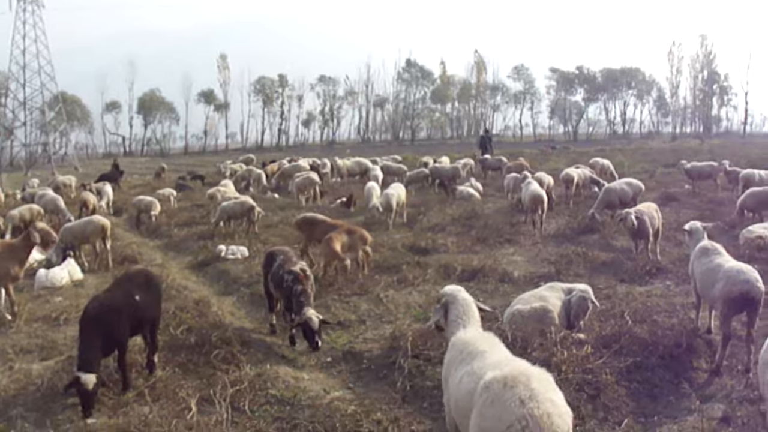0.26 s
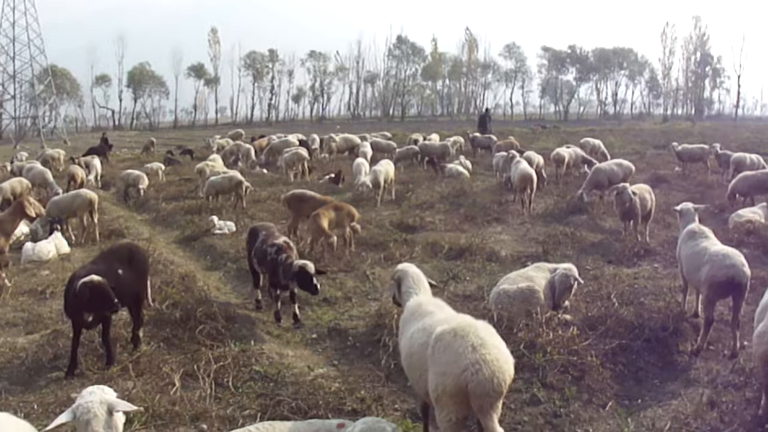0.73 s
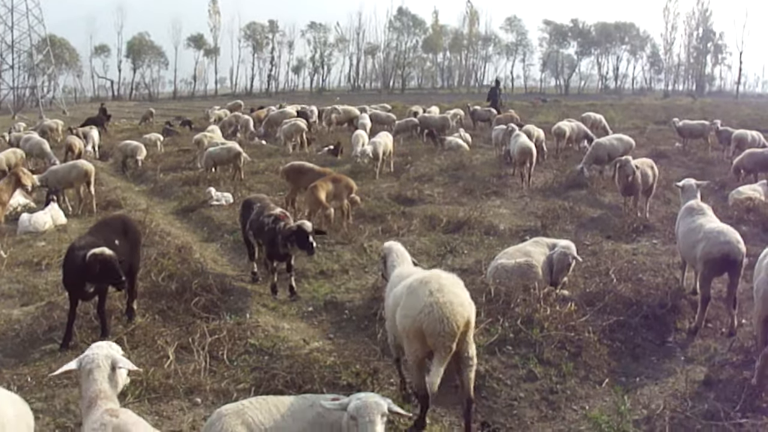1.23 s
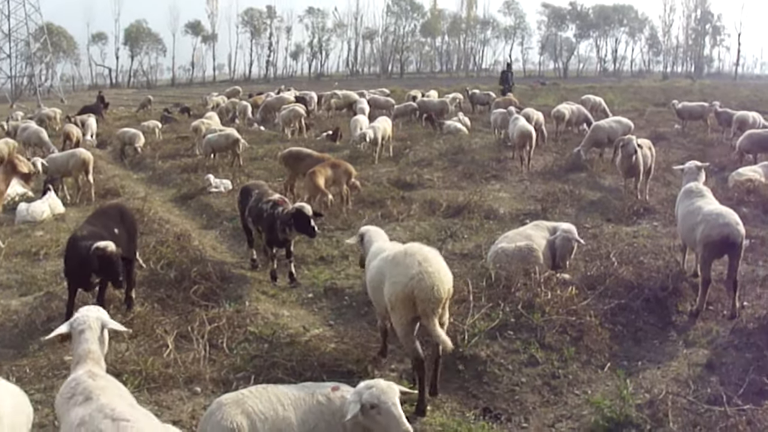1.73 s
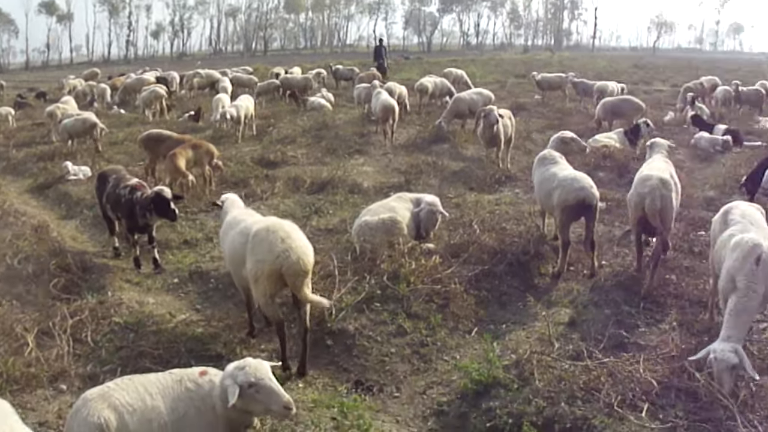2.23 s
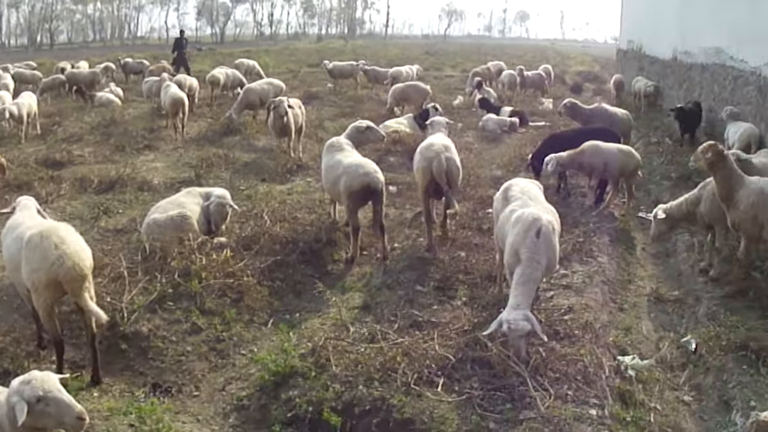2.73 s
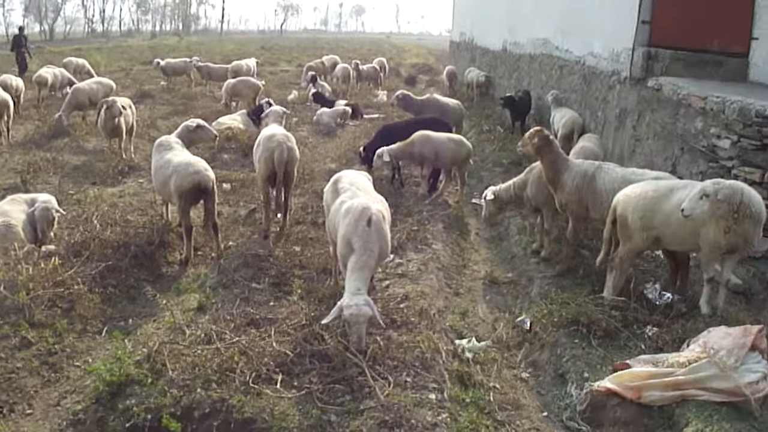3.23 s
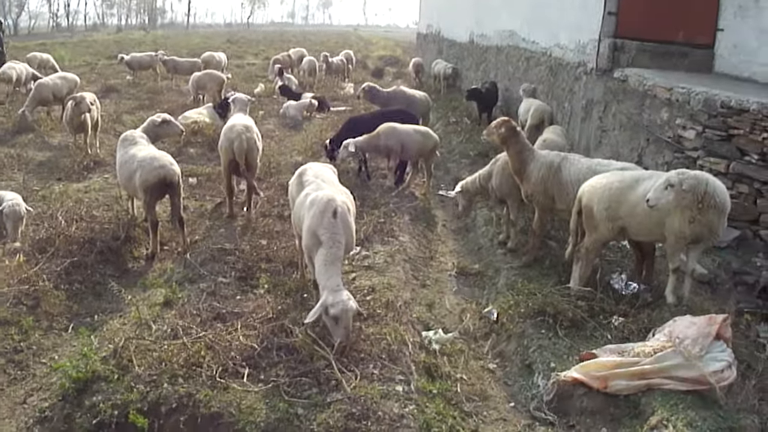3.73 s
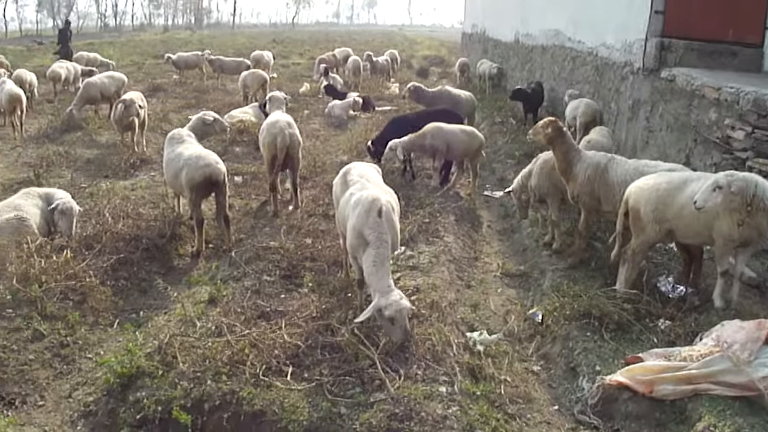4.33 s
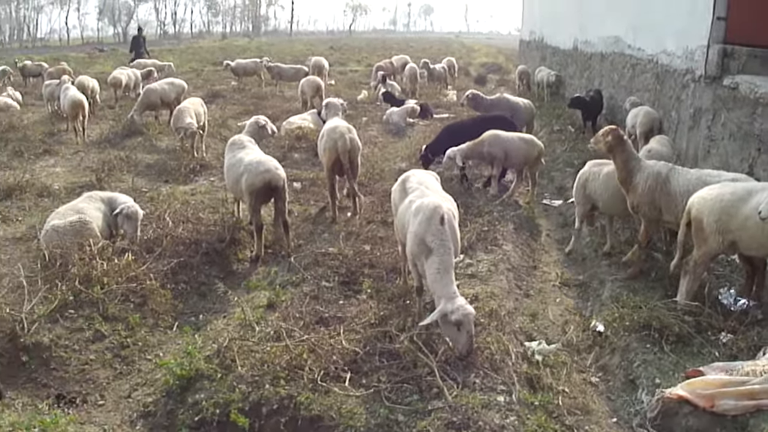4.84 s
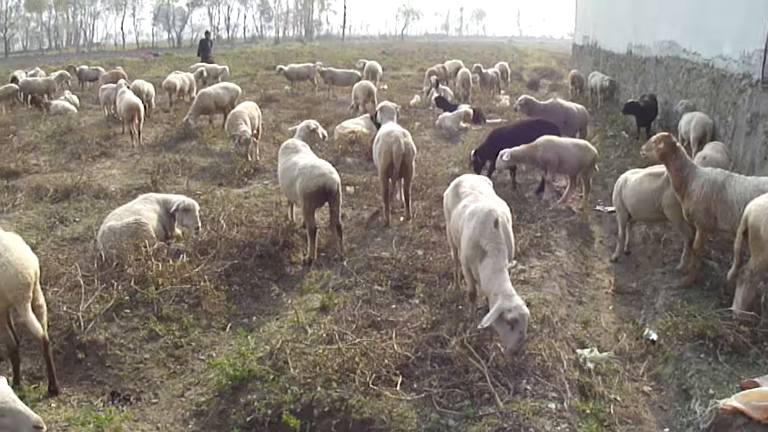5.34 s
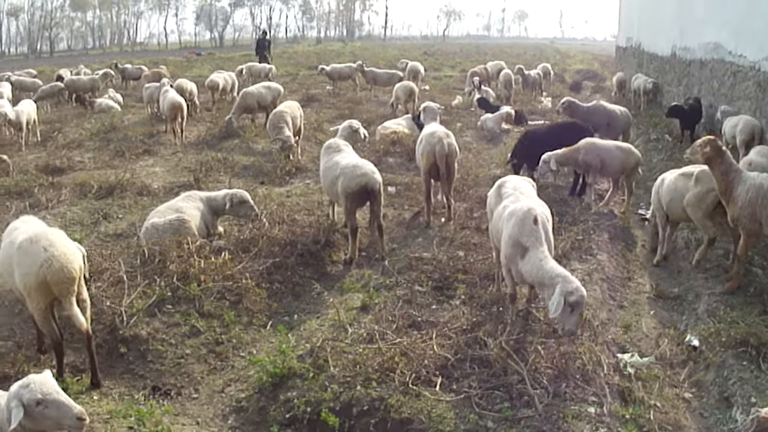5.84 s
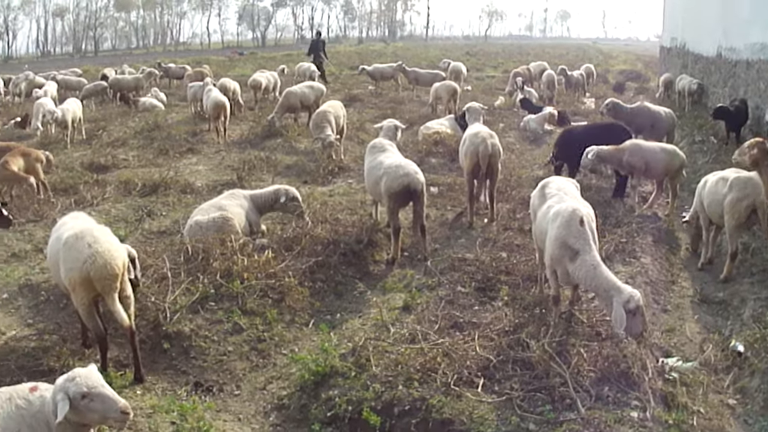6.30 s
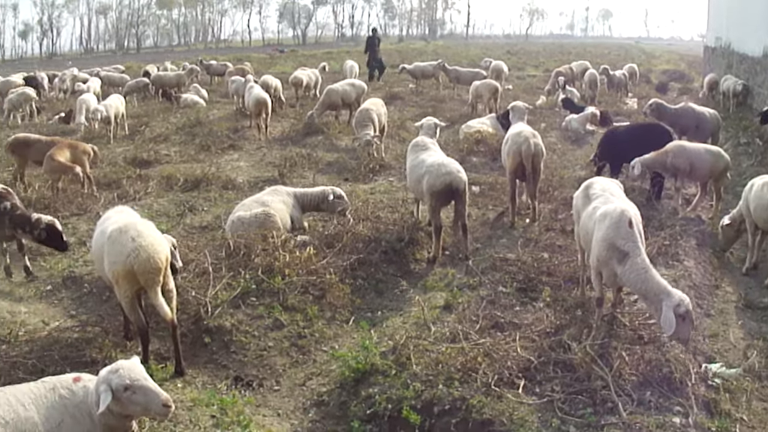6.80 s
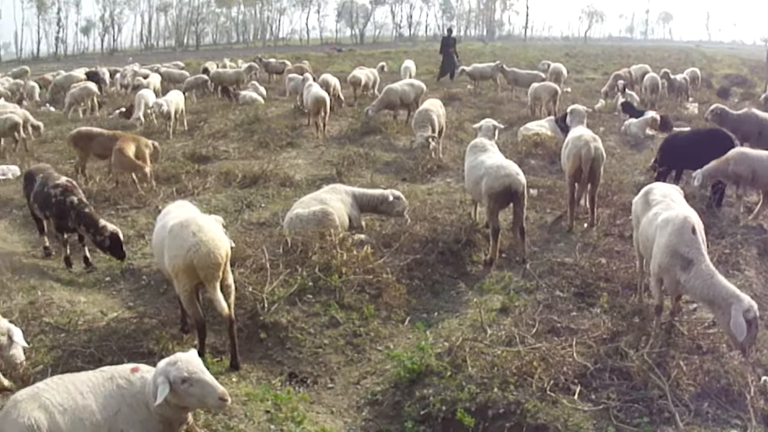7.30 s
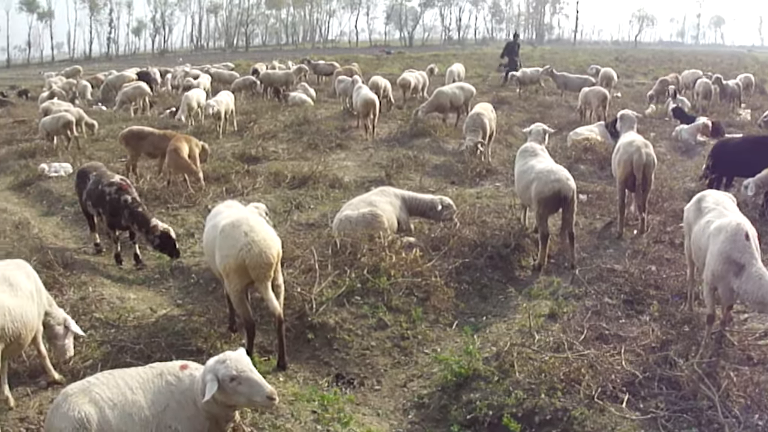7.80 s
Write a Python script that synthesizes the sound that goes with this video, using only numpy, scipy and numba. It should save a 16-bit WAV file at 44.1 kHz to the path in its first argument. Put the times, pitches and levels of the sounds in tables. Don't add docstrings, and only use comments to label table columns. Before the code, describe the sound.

Outdoors in a dry field with a grazing flock, stalks crackle and twigs snap under hooves while wind bumps the small microphone. A near sheep gives a loud, nasal bleat ending in a rattle, and a distant one answers with a low, faint grumble. After a quieter gap comes a softer, steady bleat, then a last loud one roughening at its end. A far one-cylinder engine throbs softly throughout.

```python
import sys
import numpy as np
from scipy import signal
from scipy.io import wavfile
from scipy.ndimage import uniform_filter1d
from numba import njit

SR = 44100
rng = np.random.default_rng(int(sys.argv[2]) if len(sys.argv) > 2 else 0)


def store_wav(level_fs):
    pcm = np.round(np.clip(np.atleast_2d(level_fs), -1, 1) * 32767)
    wavfile.write(sys.argv[1], SR, pcm.T.astype(np.int16))


def attenuation_scalar(level_db):
    decades = np.asarray(level_db, float) / 20
    return 10 ** decades


N = 355446

# (time [s], level [dB], mouth opening [0-1], effort [dB])
NEAR_CALL = [
    (1.362, -41.5, 0, -1),
    (1.452, -39, 0, 4),
    (1.463, -22, 0.02, 7.5),
    (1.6, -18, 0.83, -0.5),
    (1.796, -19, 0.79, 3.5),
    (1.974, -19.5, 0.82, -2),
    (2.19, -21.5, 0.56, -1.5),
    (2.365, -25, 0.45, 2),
    (2.42, -74, 0.02, -15),
]
FAR_CALL = [
    (2.469, -69, 0.36, 0),
    (2.51, -45.5, 0.87, -1),
    (2.6, -47, 0.97, 5.5),
    (2.766, -45, 0.3, 4),
    (2.86, -37, 0.51, -7),
    (2.93, -40.5, 0.45, -4),
    (3.01, -42.5, 0.27, -8),
    (3.2, -45.5, 0.29, -11),
    (3.28, -59, .5, -1),
]
MIDDLE_CALL = [
    (4.53, -46, 0.12, -8),
    (4.551, -35.5, 0.096, -2),
    (4.585, -29, 0.15, -2),
    (4.69, -28.5, 0.34, 2.5),
    (4.85, -29.5, 0.57, 4),
    (5.029, -29.5, 0.79, 9.5),
    (5.26, -29, 0.81, 3.5),
    (5.575, -31, 0.5, -2),
    (5.63, -66, 0.32, -11),
]
LAST_CALL = [
    (6.597, -54, 0.16, 9),
    (6.666, -42, 0.27, -4),
    (6.737, -29, 0.047, -2.5),
    (6.84, -18.5, 0.56, 2.5),
    (6.92, -20, 1, 4.5),
    (7.22, -23, 0.98, 0),
    (7.32, -24, 0.75, -0.5),
    (7.517, -26.5, 0.74, -3.5),
    (7.6, -75, 0.0018, -28),
]
# (time [s], pitch [Hz])
FOLD_PITCH = [
    [(1.44, 131.1), (1.482, 145.3), (1.56, 172.2), (1.602, 177.8), (1.658, 182.5), (1.794, 187.2),
     (1.974, 192.2), (2.12, 193.8), (2.3, 187.5)],
    [(2.47, 129.8), (2.572, 131.7), (2.766, 133.3), (2.85, 119.9), (3.0, 125.8), (3.28, 118)],
    [(4.5, 154.5), (4.556, 154.2), (4.592, 166.2), (4.64, 174.4), (4.694, 178.4), (4.886, 175),
     (5.31, 171.9), (5.534, 165.2), (5.6, 147)],
    [(6.6, 132.6), (6.765, 146.6), (6.81, 165.9), (6.84, 172.1), (6.9, 181), (7.058, 185.9), (7.3, 190.2),
     (7.43, 188), (7.5, 174)],
]
# (catch [s], clear voice [s], second folds start [s], folds go slack [s],
# unsteadiness when slack [0-1])
FOLD_TIMES = [(1.45, 1.565, 1.97, 2.17, .17), (2.48, 2.52, 9, 2.79, .8), (4.545, 4.6, 9, 5.6, .2),
              (6.735, 6.83, 7.28, 7.3, .15)]
# (lower shut [Hz], lower open [Hz], middle shut [Hz], middle open [Hz],
# upper at the start [Hz], climb of the upper [Hz/s])
MOUTH_SHAPES = [(628, 735, 1184, 1396, 2153, 463), (438, 486, 910, 820, 1114, 10),
                (470, 664, 1100, 1260, 1800, 115), (440, 760, 1250, 1300, 2160, 575)]
# (middle resonance [dB], upper resonance [dB], effort the middle one follows [share],
# cheek [dB], chest hum [dB])
BALANCES = [(-0.5, -0.5, 0.16, -14.5, -33), (-7, -5, 0.092, -22, -24), (-2.5, 6, 0.6, -4.5, -24),
            (3.5, 6, 1.25, -31, -19)]
# (lowest radiated [Hz], nose [dB], treble [dB], side resonance [Hz], side resonance [dB], #
# signed factor on the middle and upper resonances, width of lower [Hz], of middle [Hz], of upper [Hz])
TRACTS = [(265, -10.5, -26, 2300, -35.5, 0.81, 71, 136, 220), (296, -6, -49, 1100, -4, -1.26, 47, 140, 140),
          (417, -48, -37, 2450, -18.5, 0.6, 145, 200, 160),
          (260, -3.5, -26, 1300, -19, -1.01, 94, 230, 330)]
# (centre [Hz], width [Hz], level [dB])
HIGH_RESONANCES = [
    [(3290, 210, 6.5), (3980, 51, -1.5), (4470, 110, -4.5), (5330, 80, -5.5), (5780, 240, -8.5),
     (6920, 260, -10.5), (7600, 440, -20)],
    [(3300, 200, 6)],
    [(2990, 660, 4.5), (3820, 120, -6), (3980, 260, 3.5), (5200, 350, -1), (6300, 400, -7)],
    [(3434, 210, 8.5), (4020, 56, 3.5), (4430, 110, -6.5), (5100, 120, -4.5), (5730, 150, -8.5),
     (6850, 300, -11.5), (7670, 440, -23)],
]
# (start [Hz], drift [Hz/s], width [Hz], first depth [0-1], last depth [0-1])
NASAL_POCKETS = [
    [(1710, 40, 270, 0, 0.73), (3000, 10, 77, 0.3, .1)],
    [(300, 10, 102, .3, .3)],
    [(900, -9, 61, 0.9, .1), (1550, -43, 96, 0.5, 0.9), (343, -12, 90, 0.8, 0.35)],
    [(1890, -100, 99, 0.7, 0.32), (2670, 299.5, 140, 0.4, 0.21)],
]
RATTLE_MIDDLE = [1, 0, 0, -6]
RATTLE_SPILL = [-30.5, -60, -60, -35]
RATTLE_TREBLE = [1, 0, 0, -2.5]
# (through the open mouth [dB], in the rattle [dB], pulse scatter in the rattle [dB],
# head start of the second folds [turns])
FOLD_SNAPS = [(-20, -20, 1.5, -0.422), (-27, -30, 0, 0), (-14, -11, 0, 0), (-17.5, -6.5, 2, 0.014)]
# (lag behind the resonances [ms], sign against them [+-1], sign of the call [+-1])
SNAP_PHASES = [(.09, 1, 1), (.09, 1, 1), (.54, -1, -1), (.31, 1, 1)]
# (time [s], half length [s], centre [Hz], width [Hz], gain [dB])
COLOUR_SHIFTS = [(1.48, 0.037, 900, 180, -11), (1.525, .03, 2600, 410, 5), (1.5, 0.037, 450, 120, 5),
                 (1.5, .025, 620, 120, 0), (1.49, .03, 2100, 1800, -2), (2.07, 0.089, 770, 120, -3.5),
                 (2.202, 0.27, 4100, 300, 11.5), (2.28, 0.12, 3900, 360, -8), (5.3, 0.59, 2700, 160, -0.5),
                 (7.34, 0.073, 3200, 270, -7), (7.42, 0.099, 5300, 1550, 4), (7.4, 0.089, 433, 200, -0.5),
                 (7.05, 0.16, 5900, 900, 7), (1.54, 0.033, 620, 140, 1.5), (1.585, 0.062, 1120, 250, -12),
                 (1.65, 0.07, 365, 120, -4), (1.7, 0.12, 1700, 300, 4), (1.75, 0.049, 720, 250, 0),
                 (1.85, 0.06, 2450, 150, -11), (1.92, .04, 1400, 150, -5), (2.44, .05, 740, 600, 0),
                 (4.6, 0.035, 1300, 150, -12), (4.82, 0.13, 1030, 94, 3.5), (4.9, 0.057, 1750, 150, 1),
                 (5.06, .1, 1390, 180, 3.5), (5.16, 0.045, 1210, 100, -11), (5.15, 0.2, 330, 160, 2),
                 (5.3, .05, 1800, 130, -3), (5.5, 0.042, 1600, 150, 0), (5.57, 0.032, 1200, 710, -8),
                 (6.75, .03, 725, 130, -15), (6.78, 0.035, 520, 250, 7.5), (6.76, 0.05, 2100, 400, 2.5),
                 (6.78, .02, 1220, 130, -10), (6.86, 0.053, 1200, 130, -16), (6.82, .025, 1700, 150, -3),
                 (6.95, .04, 1645, 140, -5), (7, .05, 530, 260, 4), (6.9, 0.07, 2050, 120, -3),
                 (7.24, 0.06, 2930, 460, -9)]
ECHO_LEVELS = [-8, -10, -6, -6.5]
# (time [s], level [dB], half length [s])
HOOF_STEPS = [(.2, -60, 0.068), (.4, -59.5, 0.1), (.97, -58.5, 0.047), (.573, -46, 0.0038),
              (.66, -55.5, 0.11), (.86, -58, 0.067), (1.25, -52.5, 0.1), (1.4, -58, 0.059),
              (2.8, -66.5, 0.2), (3.2, -63, 0.075), (3.251, -49, 0.0042), (3.4, -67, 0.19),
              (3.63, -59, .006), (3.8, -67, 0.14), (4.32, -69, 0.11), (5.8, -74.5, 0.092),
              (6.35, -60.5, 0.014), (6.422, -63, 0.005), (7.78, -74, .04), (7.94, -78, 0.05)]
# (time [s], peak level [dB], ring [Hz])
SHORT_TICKS = [(0.1316, -48, 1710), (0.226, -35.5, 890), (0.238, -37, 1200), (0.3212, -50, 1970),
               (0.3694, -36, 4330), (0.524, -44, 7500), (0.5712, -22.5, 4660), (0.5994, -46, 8040),
               (0.6399, -44, 2010), (0.722, -35, 7600), (0.7288, -33, 5330), (0.832, -39, 2050),
               (0.841, -37, 3000), (0.8866, -34, 5500), (0.9612, -37, 3120), (1.342, -33, 1890),
               (1.3425, -34, 1000), (1.365, -35, 1900), (1.3655, -31, 900), (1.392, -23, 1950),
               (1.3925, -38, 5200), (1.4235, -24.5, 2600), (1.4257, -31, 4700), (1.4256, -43, 7200),
               (1.447, -22, 1580), (1.4615, -32, 5100), (2.648, -44, 2303), (2.7226, -40, 2560),
               (2.7596, -40, 3904), (2.8004, -40, 4320), (2.803, -44, 7980), (2.8685, -38, 2860),
               (2.869, -39, 6300), (2.9432, -46, 2540), (3.1772, -45, 3500), (3.249, -31.5, 6300),
               (3.2495, -40, 9500), (3.285, -41, 5000), (3.3942, -39, 3500), (3.405, -43, 6200),
               (3.5034, -43, 2650), (3.5835, -38, 3950), (3.584, -40, 6600), (3.6187, -44, 3970),
               (3.878, -45, 7500), (3.934, -42, 2720), (4.022, -44, 7200), (4.2009, -43, 2930),
               (4.2273, -48, 4800), (4.46, -50, 7500), (5.8923, -42, 2670), (6.0524, -45, 4200),
               (6.1806, -42, 2640), (6.3647, -44, 2620), (6.4161, -41, 2610), (6.5692, -44, 2640),
               (6.677, -25, 2310), (6.678, -33, 810), (7.783, -43, 2720), (7.8418, -45, 2420)]
# (time [s], peak level [dB])
BELL_TOUCHES = [(4.4393, -50.5), (4.5391, -47), (4.6174, -49)]
# (frequency [Hz], level [dB], 60 dB decay [s])
BELL_MODES = [(3600, 1, 0.14), (4240, -10, .1), (8860, -12.5, 0.17)]
# (time [s], level [dB], half length [s])
WIND_PUFFS = [(0, -50, 0.023), (.31, -61, .07), (.58, -65, 0.04), (.85, -47.5, 0.19), (1.13, -44, 0.04),
              (1.38, -38.5, 0.12), (2.54, -64, 0.053), (3.2, -69, 0.16), (3.77, -56, .04),
              (3.97, -52, 0.035), (4.44, -54, 0.092), (5.44, -43, 0.093), (5.9, -51, 0.037),
              (6.09, -51, 0.045), (6.21, -47, 0.042), (6.46, -46.5, 0.036), (6.69, -62, .03),
              (6.98, -55, .07), (7.21, -62, .06), (7.55, -65, .1), (7.95, -55, 0.042), (8.06, -43, 0.036)]
# (time [s], peak level [dB], frequency [Hz])
WIND_THUMPS = [(0.004, -37, 153), (0.669, -39, 145), (0.707, -28, 178), (0.765, -31.5, 198),
               (0.796, -33.5, 210), (0.857, -28, 153), (1.114, -30, 239), (1.134, -28.5, 172),
               (1.148, -36, 370), (1.174, -38, 116), (1.271, -27, 235), (1.285, -29, 171),
               (1.336, -29, 260), (1.374, -32, 282), (1.456, -27.5, 199), (5.439, -34, 223),
               (5.463, -33, 254.6), (5.503, -22.5, 278), (5.518, -31, 211.4), (5.532, -27.5, 240),
               (6.209, -38, 246), (6.229, -36, 230), (6.44, -38, 177)]
# (time [s], level [dB])
EXHAUST_LEVEL = [(0, -55), (1, -56), (2.5, -57.5), (3.5, -58.5), (4.3, -52.5), (4.7, -49.5), (5.5, -50.5),
                 (6.2, -52), (6.7, -48), (7.3, -53), (8.06, -51.5)]
# (centre [Hz], width [Hz], level [dB])
EXHAUST_RESONANCES = [(156.5, 22, -9.5), (246, 3.3, -1), (353, 40, -7.5), (515, 30, -13.5)]
# (time [s], level [dB])
MACHINE_LEVEL = [(0, -73.5), (2.8, -75), (3.0, -63), (3.7, -66), (4.3, -63.5), (4.5, -58), (4.6, -58),
                 (5.6, -65), (5.8, -64.5), (6.2, -69), (8.06, -69)]
# (centre [Hz], width [Hz], level [dB])
PANELS = [(1910, 260, 4), (3130, 150, -7), (3590, 330, -5.5), (9480, 300, -19)]
# (frequency [Hz], density [dB per Hz])
FIELD_SPECTRUM = [(18, -52), (30, -42), (142, -12.5), (210, -18), (244, -4.5), (328, -12.5), (430, -3.5),
                  (721, -18), (816, -12), (1930, -12.5), (2360, -12.5), (9600, -29.5), (10900, -44),
                  (14100, -74), (22000, -120)]

CREAK, CAUGHT, CRACK, CLEAR = .65, .07, .13, .02
SECOND_HZ, SLACK_RISE_HZ = 231.5, 8
SECOND_SIZE, COUPLING, SUM_GAIN = .1, .55, 2.2
SECOND_WANDER = .004
SNAP_FLOOR, SNAP_DECAY, SNAP_GROWS_S = .62, .25, .15
RATTLE_EVEN, RATTLE_NOSE_DB, RATTLE_CHEEK_DB = .45, -4, 4
RATTLE_DULL_DB, RATTLE_WIDTH_HZ, RATTLE_LIFT_HZ = -7.5, 84, 30
RATTLE_TILT_DB_PER_KHZ, RATTLE_SPREAD_HZ = 0.5, 88
NOSE_HZ, CHEEK_HZ, CHEEK_WIDTH_HZ, MOUTH_EDGE_HZ = 387, 1045, 340, 2870
TREBLE_WANDER, TREBLE_PATCH_DB = .018, 2.8
SHUT_TREBLE_DB, HAZE_DB = -1.5, -8
SECOND_HUM_DB, SUM_HUM_DB = -17, -6
GRAZING_DB, TICK_CYCLES = -64, 4.2
BREEZE_DB, BREEZE_SWING_DB = -68, 5
ENGINE_HZ, FIELD_DB = 18.63, -47.5
CLATTER_DECAY, CLATTER_FLICKER_DB = 0.5, 3
MIC_TOP_HZ = 10900


def bleat(call, pitch, voice, shape, balance, tract, highs, pockets,
          rattle_mid_db, spill_db, rattle_treble_db, snap, timing):
    low_hz, nose_db, treble_db, side_hz, side_db, gap, *widths = tract
    mid_db, top_db, mid_effort, cheek_db, hum_db = balance
    first = int(call[0][0] * SR)
    t = np.arange(first, int(call[-1][0] * SR)) / SR
    (hz,), (db, opening, effort_db) = curve(pitch, t), curve(call, t)
    rough, share, second_hz = voicing(t, *voice)
    centres = [shape[0] + opening * (shape[1] - shape[0]),
               shape[2] + RATTLE_LIFT_HZ * share + opening * (shape[3] - shape[2]),
               shape[4] + shape[5] * (t - t[0])]
    mid_db = mid_db + mid_effort * effort_db + rattle_mid_db * share
    top_db = top_db + effort_db + RATTLE_DULL_DB * share
    db = db - 10 * np.log10(1 + gap ** 2 * (attenuation_scalar(mid_db) ** 2 + attenuation_scalar(top_db) ** 2))
    hz = hz + share * (np.clip(hz, 187, 194) - hz)
    flow, bright, phase, second = folds(t, hz, rough, share, second_hz, voice[2], snap)
    flow = signal.sosfilt(signal.butter(5, low_hz, "high", fs=SR, output="sos"), flow)

    widths[0] = widths[0] * (1 + 0.5 * rough)
    widths[1] = widths[1] + share * (RATTLE_WIDTH_HZ - widths[1])
    widths[2] = widths[2] * (1 + 0.37 * share)
    sources = (flow, flow, bright)
    lower, middle, upper = (steady(band(f, c, w)) for f, c, w in zip(sources, centres, widths))
    lower, middle = even(lower, RATTLE_EVEN * share), even(middle, RATTLE_EVEN * share)
    cheek = steady(band(flow, CHEEK_HZ, CHEEK_WIDTH_HZ))
    lower = lower + attenuation_scalar(cheek_db + mid_db + RATTLE_CHEEK_DB * share) * cheek
    nose_open = np.clip((hz - 160) / 20, 0, 1)
    nose = attenuation_scalar(nose_db + RATTLE_NOSE_DB * share) * nose_open * steady(band(flow, NOSE_HZ, 210))
    upper = upper - attenuation_scalar(side_db) * steady(band(bright, side_hz, 420))
    mouth = lower - nose + gap * (attenuation_scalar(mid_db) * middle - attenuation_scalar(top_db) * band(upper, centres[2], 1200))

    lag_ms, snap_sign, call_sign = timing
    bare = band(bright, 910, 3100)
    bare = steady(signal.sosfilt(signal.butter(2, low_hz, "high", fs=SR, output="sos"), bare))
    bare_gain = attenuation_scalar(snap[0] + share * (snap[1] - snap[0]))
    mouth = mouth + snap_sign * bare_gain * np.roll(bare, int(lag_ms * SR / 1000))
    mouth = signal.sosfilt(signal.butter(6, MOUTH_EDGE_HZ, fs=SR, output="sos"), mouth)
    for pocket_hz, drift, width, *depth in pockets:
        cut = np.clip(np.linspace(*depth, len(t)), 0, 1)
        mouth = mouth - cut * band(mouth, pocket_hz + drift * (t - t[0]), width)

    slack = share * (second_hz - SECOND_HZ) / SLACK_RISE_HZ
    slack_hum = attenuation_scalar(SECOND_HUM_DB) * np.cos(second) + attenuation_scalar(SUM_HUM_DB) * np.cos(phase + second)
    mouth = mouth + attenuation_scalar(hum_db) * (1 - share) * np.cos(phase) + slack * slack_hum
    thin = signal.sosfilt(signal.butter(4, 2900, "high", fs=SR, output="sos"), bright)
    mouth = mouth + share * attenuation_scalar(spill_db) * steady(band(thin, 3000, 760))
    stretch = (centres[2] / np.mean(centres[2])) ** 0.27 * (1 + 0.043 * (opening - .7))
    treble_db = treble_db + rattle_treble_db * share + 0.8 * top_db + SHUT_TREBLE_DB * (1.9 - opening)
    mouth = mouth + attenuation_scalar(treble_db) * high_modes(thin, highs, stretch, share)
    out = np.zeros(N)
    out[first:first + len(t)] = -call_sign * attenuation_scalar(db) * mouth * signal.windows.tukey(len(t), .04)
    return out


def voicing(t, catch, clear, second, slack, loose):
    rough = np.interp(t, [t[0], catch, clear - .02, clear], [CREAK, CAUGHT, CAUGHT, CLEAR])
    rough = rough + CRACK * (second < t[-1]) * np.exp(-((t - clear + .025) / .012) ** 2)
    share = ramp(t, second - .015, second + .015)
    rough = rough + .025 * share + loose * ramp(t, slack - .04, slack) * (.8 + t - slack)
    return rough, share, SECOND_HZ + SLACK_RISE_HZ * ramp(t, slack - .03, slack + .06)


def folds(t, hz, rough, share, second_hz, second_start, snap):
    n = len(t)
    phase = 2 * np.pi * np.cumsum(hz * (1 + .1 * rough * walk(150, n))) / SR
    wander = .11 * rough * walk(100, n) + SECOND_WANDER * walk(30, n)
    second = 2 * np.pi * np.cumsum(second_hz * (1 + wander)) / SR + 2 * np.pi * snap[3]
    phase = phase + .13 * share * np.sin(second)
    pulses = -1 / (1 - .955 * np.exp(1j * phase))
    others = np.exp(1j * second) / (1 - .9 * np.exp(1j * second)) ** 2
    gated = (pulses + .6) * share * COUPLING * np.exp(2j * second - 1.5j)
    added = share * SECOND_SIZE * others * (1 + SUM_GAIN * COUPLING * np.exp(1j * phase + 2j))
    both = pulses + gated + added
    breath = rough * 2.2 * np.abs(pulses) ** .5 * band(rng.standard_normal(n), 1200, 3500) * 1.6
    shimmer = attenuation_scalar((np.minimum(6 * rough, 2) + snap[2] * share) * walk(120.4, n))
    beat = (second - phase) / (2 * np.pi) % 1
    fade = SNAP_FLOOR - 1 + uniform_filter1d(np.exp(-beat / SNAP_DECAY), size=90)
    grown = ramp(t, second_start, second_start + SNAP_GROWS_S)
    bright = pulses.real * shimmer * (1 + grown * fade) + breath
    return both.real * shimmer + breath, bright, phase, second


def high_modes(thin, highs, stretch, share):
    n, treble = len(thin), 0
    for k, (hz, width, db) in enumerate(highs):
        tilt_db = RATTLE_TILT_DB_PER_KHZ * share * (hz / 1000 - 5.5)
        gain = (-1) ** k * attenuation_scalar(db + TREBLE_PATCH_DB * walk(8.64, n) + tilt_db)
        centre = hz * stretch * (1 + TREBLE_WANDER * walk(5, n))
        treble = treble + gain * steady(band(thin, centre, 0.66 * width + RATTLE_SPREAD_HZ * share))
    return treble + attenuation_scalar(HAZE_DB) * steady(band(thin * attenuation_scalar(4 * walk(200, n)), 4900, 4500))


def even(x, share):
    power = uniform_filter1d(uniform_filter1d(x ** 2, size=260), size=260)
    return x * (power + .05) ** (-share / 2)


def shift_colour(x):
    x = x.copy()
    for s, half, hz, width, db in COLOUR_SHIFTS:
        near = slice(int((s - 3 * half) * SR), int((s + 3 * half) * SR))
        part = x[near]
        gain = attenuation_scalar(db * np.exp(-np.linspace(-3, 3, len(part)) ** 2))
        x[near] = part + (gain - 1) * band(part, hz, width)
    return x


def reflections(calls):
    lag = np.arange(9000) / SR
    echoes = rng.standard_normal(len(lag)) * np.exp(-lag / .025) * (lag > .003)
    wet = sum(attenuation_scalar(db) * call for call, db in zip(calls, ECHO_LEVELS))
    return signal.fftconvolve(wet, echoes / np.sqrt(np.sum(echoes ** 2)))[:N]


def stalks(t):
    grains = rng.standard_normal(N) * attenuation_scalar(3.5 * np.minimum(rng.exponential(size=N), 7)) * attenuation_scalar(2.5 * walk(25))
    crackle = level(band(band(grains, 3300, 3300), 3600, 4700), 0) + level(band(grains, 1400, 2700), 2.7)
    return swells(HOOF_STEPS, t, GRAZING_DB) * attenuation_scalar(-4.0) * crackle


def short_ticks():
    out, ring = np.zeros(N), np.arange(400) / SR
    for s, db, hz in SHORT_TICKS:
        scatter = uniform_filter1d(rng.standard_normal(len(ring)), size=3)
        envelope = np.exp(-ring * hz / TICK_CYCLES) * np.minimum(ring * hz, 1)
        tick = envelope * (np.sin(2 * np.pi * hz * ring) + 0.11 * scatter)
        out[int(s * SR):int(s * SR) + len(ring)] += attenuation_scalar(db) * tick
    return out


def bell():
    out, ring = np.zeros(N), np.arange(6000) / SR
    note = sum(attenuation_scalar(db - 60 * ring / t60) * np.sin(2 * np.pi * hz * ring) for hz, db, t60 in BELL_MODES)
    for s, db in BELL_TOUCHES:
        out[int(s * SR):int(s * SR) + len(ring)] += attenuation_scalar(db) * note
    return out


def wind(t):
    bumps = rng.standard_normal(N) * attenuation_scalar(5 * walk(40))
    flutter = steady(band(band(bumps, 95, 170), 110, 370))
    out = swells(WIND_PUFFS, t, BREEZE_DB + BREEZE_SWING_DB * walk(8)) * flutter
    ring = np.arange(1600) / SR
    for s, db, hz in WIND_THUMPS:
        swing = ring / .0032 * np.exp(1 - ring / .0032) * np.sin(2 * np.pi * hz * ring)
        out[int(s * SR):int(s * SR) + len(ring)] += attenuation_scalar(db) * swing
    return out


def engine(t, cycle):
    firing = np.diff(np.floor(cycle), prepend=0) * attenuation_scalar(2.8 * walk(ENGINE_HZ))
    exhaust = sum(attenuation_scalar(db) * level(band(firing, hz, w), 0) for hz, w, db in EXHAUST_RESONANCES)
    return attenuation_scalar(curve(EXHAUST_LEVEL, t)[0]) * level(exhaust, 0)


def machinery(t, cycle):
    machine_db, out = curve(MACHINE_LEVEL, t)[0], 0
    for hz, width, db in PANELS:
        noise = (0.37 + np.exp(-(cycle % 1) / CLATTER_DECAY)) * rng.standard_normal(N)
        panel = level(band(band(noise, hz, width), hz, 2 * width), 0)
        panel_db = np.minimum(machine_db, -64 if hz > 2500 else 0)
        out = out + attenuation_scalar(db + CLATTER_FLICKER_DB * walk(12) + panel_db) * panel
    return out


def field(cycle):
    out, swell = 0, walk(0.56)
    puff = np.exp(-(cycle % 1) / 1.3)
    hz_points, db_points = np.transpose(FIELD_SPECTRUM)
    for hz in 35 * 2 ** np.arange(0, 8.4, .5):
        db = np.interp(np.log(hz), np.log(hz_points), db_points) + 0.6 * swell + 1.1 * walk(9.1)
        throb = 1 + 4.94 * puff / (1 + (hz / 900) ** 2)
        out = out + attenuation_scalar(db) * band(band(throb * rng.standard_normal(N), hz, hz / 2), hz, hz / 2)
    return level(out, FIELD_DB)


def level(x, db):
    return x * attenuation_scalar(db) / np.sqrt(np.mean(x ** 2))


@njit
def svf(x, hz, width):
    y, b, l = np.empty(len(x)), 0., 0.
    for i in range(len(x)):
        g, k = np.tan(np.pi * hz[i] / SR), width[i] / hz[i]
        v = (b + g * (x[i] - l)) / (1 + g * (g + k))
        b, l, y[i] = 2 * v - b, l + 2 * g * v, k * v
    return y


def band(x, hz, width):
    return svf(x, hz + np.zeros(len(x)), width + np.zeros(len(x)))


def walk(rate, count=N):
    k = int(SR / rate)
    held = np.repeat(rng.standard_normal(count // k + 1), k)
    return 1.274 * uniform_filter1d(uniform_filter1d(held, k), k)[:count]


def curve(table, t):
    s, *columns = np.transpose(table)
    return [np.interp(t, s, c) for c in columns]


def steady(x):
    power = uniform_filter1d(uniform_filter1d(x ** 2, size=2400), size=2400)
    return x / np.sqrt(power + 1e-12)


def ramp(t, start, end):
    return np.clip((t - start) / (end - start), 0, 1)


def swells(events, t, floor_db):
    power = attenuation_scalar(floor_db) ** 2
    for s, db, half in events:
        power = power + (attenuation_scalar(db) / (1 + ((t - s) / half) ** 4)) ** 2
    return np.sqrt(power)


def scene():
    t = np.arange(N) / SR
    ewes = zip((NEAR_CALL, FAR_CALL, MIDDLE_CALL, LAST_CALL), FOLD_PITCH, FOLD_TIMES, MOUTH_SHAPES,
               BALANCES, TRACTS, HIGH_RESONANCES, NASAL_POCKETS, RATTLE_MIDDLE, RATTLE_SPILL,
               RATTLE_TREBLE, FOLD_SNAPS, SNAP_PHASES)
    calls = [bleat(*ewe) for ewe in ewes]
    flock = shift_colour(sum(calls) + reflections(calls))
    cycle = np.cumsum(ENGINE_HZ * (1 + .004 * walk(2))) / SR
    background = field(cycle) + engine(t, cycle) + machinery(t, cycle)
    background = background + wind(t) + stalks(t) + short_ticks() + bell()
    loudness = np.sqrt(uniform_filter1d(flock ** 2, size=2000) + 1e-12)
    held = signal.lfilter([.0003], [1, -.9997], loudness)
    duck = (1 + (held / 0.4) ** 2) ** -.2
    return (flock + duck * background)[None]


def top_cut(x):
    return signal.sosfilt(signal.butter(12, 11010, fs=SR, output="sos"), x)


def record(dry):
    x = signal.sosfilt(signal.butter(1, 90, "high", fs=SR, output="sos"), dry)
    x = signal.sosfilt(signal.ellip(10, .2, 60, MIC_TOP_HZ, fs=SR, output="sos"), x)
    return top_cut(x)


dry = scene()
out = record(dry)
store_wav(out)
```